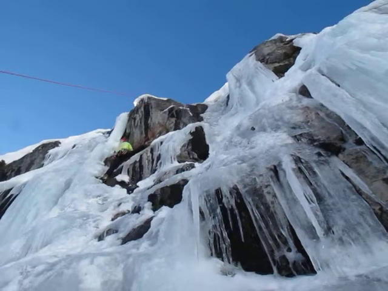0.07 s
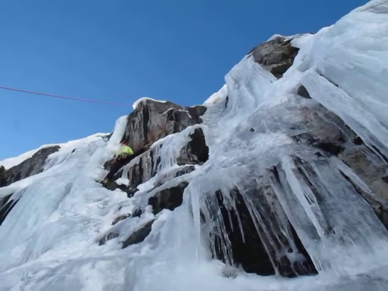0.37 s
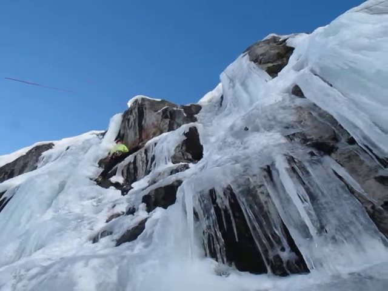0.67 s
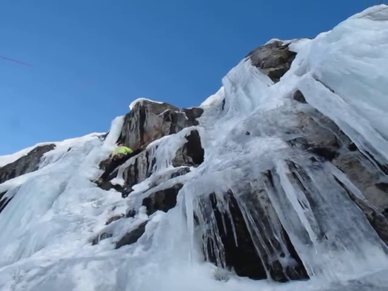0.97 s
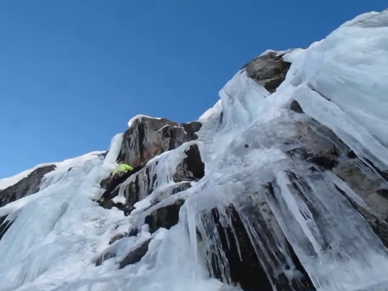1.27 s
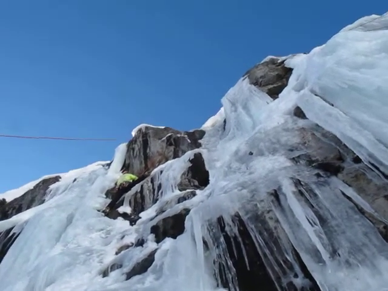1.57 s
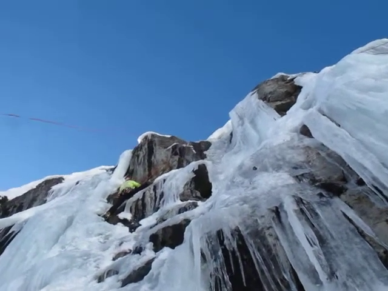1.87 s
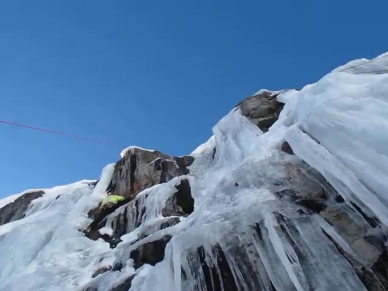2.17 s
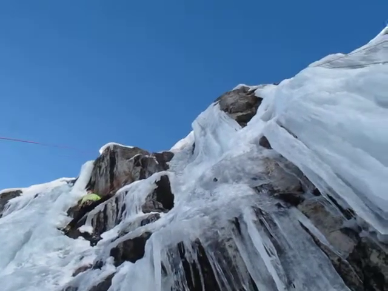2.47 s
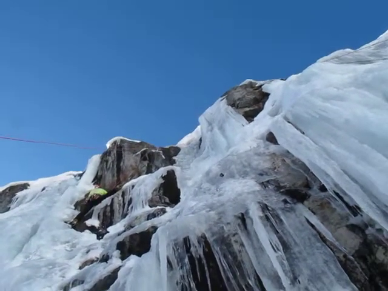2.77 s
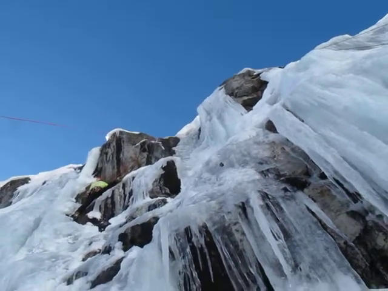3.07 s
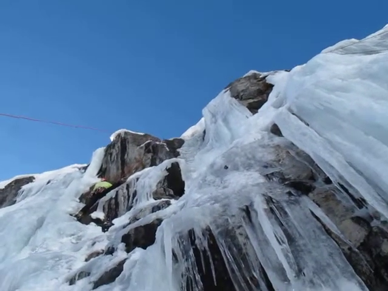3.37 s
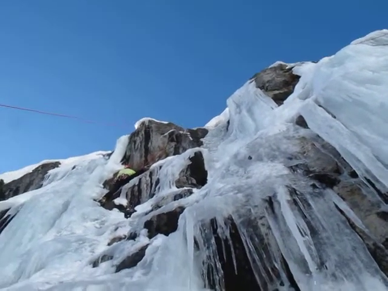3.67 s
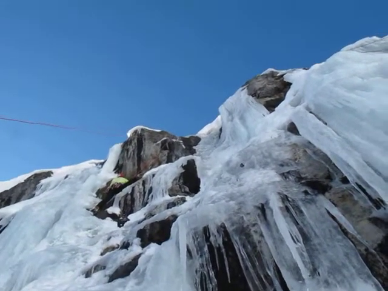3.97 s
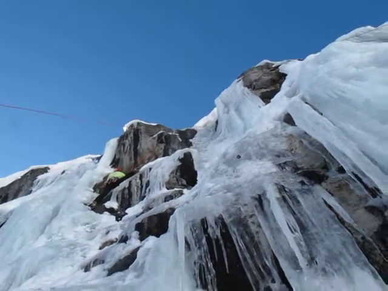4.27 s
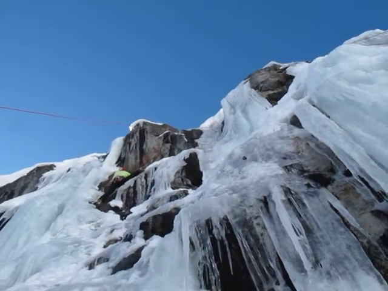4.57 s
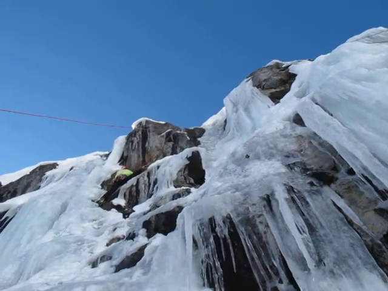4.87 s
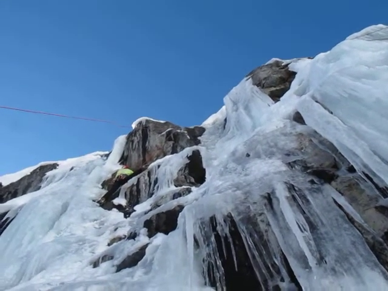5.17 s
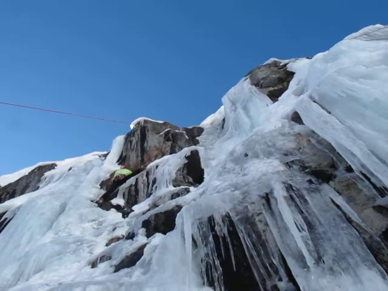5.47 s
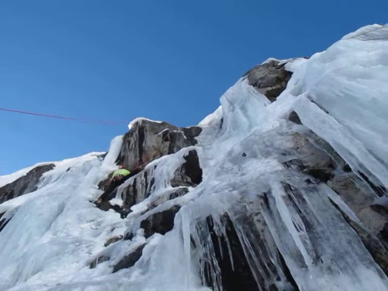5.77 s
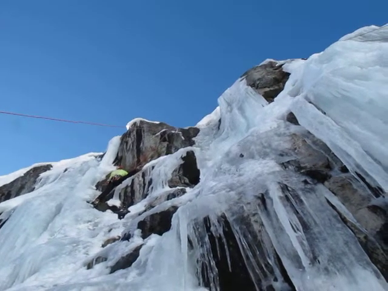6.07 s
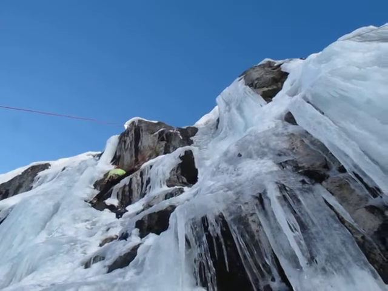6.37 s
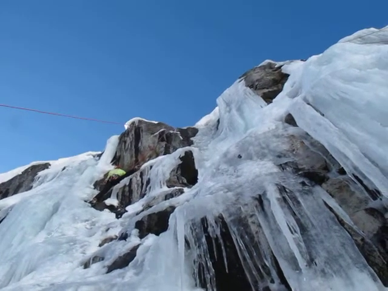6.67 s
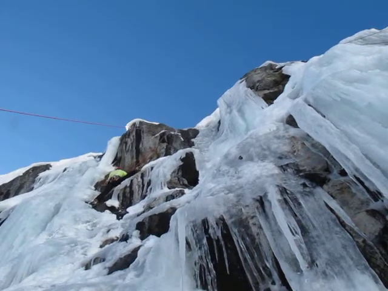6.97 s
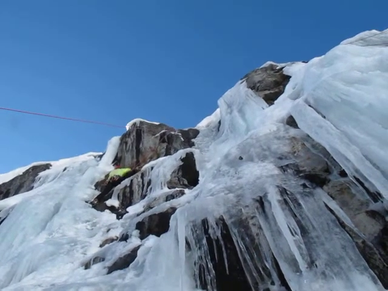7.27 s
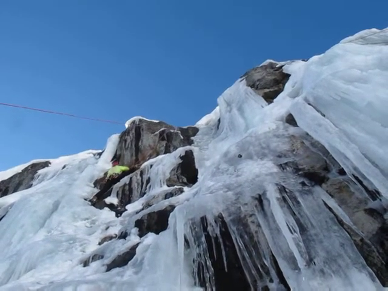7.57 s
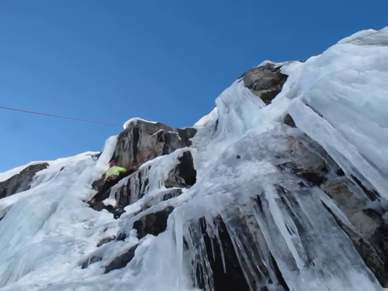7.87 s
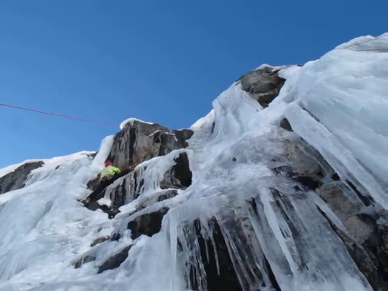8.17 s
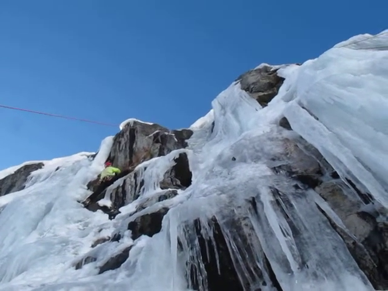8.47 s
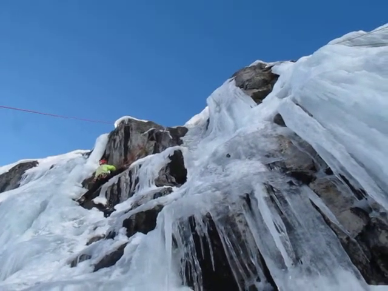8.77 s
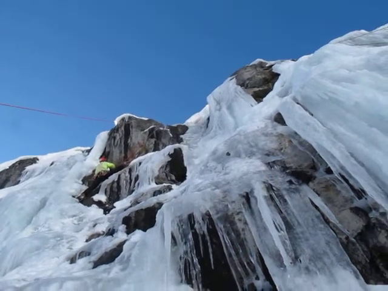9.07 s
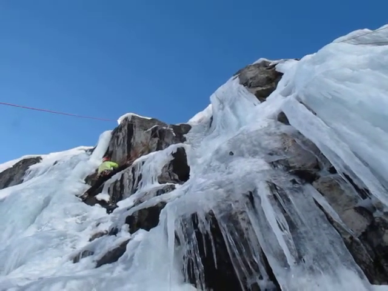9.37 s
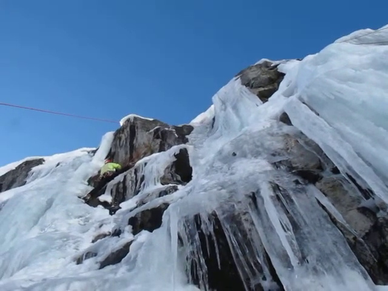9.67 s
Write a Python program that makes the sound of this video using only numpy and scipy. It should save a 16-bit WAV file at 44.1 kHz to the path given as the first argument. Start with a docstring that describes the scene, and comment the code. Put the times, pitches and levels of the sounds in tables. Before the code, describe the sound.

Light wind buffets the microphone with a low, lumpy rumble and soft thumps, over faint hiss and a little clothing rustle.

```python
"""A lumpy rumble of light wind, with clothing rustling over it for the first few seconds.
At the foot of a frozen waterfall, gusts buffet the microphone port and the strongest eddies thump it.
A sleeve catches and slips on a jacket, and the hand that holds the camera makes a few tiny ticks.
Behind it all lie the soft, even rush of the open valley and the microphone's own bright hiss."""
import sys
import numpy as np
from scipy import signal
from scipy.fft import rfft, irfft
from scipy.io import wavfile
from scipy.ndimage import uniform_filter1d

SR = 44100
rng = np.random.default_rng(int(sys.argv[2]) if len(sys.argv) > 2 else 0)


def unload_audio(sound):
    """Save the sound as a 16-bit wav file, at the path given as the first command line argument."""
    columns = np.transpose(np.atleast_2d(sound))
    # keep every value between -1 and 1, then stretch to whole-number steps
    steps = np.round(np.clip(columns, -1, 1) * 32767)
    wavfile.write(sys.argv[1], SR, steps.astype(np.int16))


N = 437472

# colour of the valley's far rush: frequency_hz, gain_db
VALLEY_EQ = [(100, -1.5), (320, 0.5), (480, 1), (630, -0.5), (780, 1), (900, -0.5), (1420, -1),
             (1650, -6.5), (2150, -6), (2500, -8.5), (2900, -19.5), (6000, -45)]
# slow rise and fall of that rush: time_s, level_db
VALLEY_FADER = [(0, -53.5), (1.6, -53), (3.9, -53.6), (4.6, -54.5), (6, -53.5), (9.1, -53), (9.92, -54)]
# colour of the microphone's hiss: frequency_hz, gain_db
HISS_EQ = [(200, -5), (2800, 0.5), (3700, 1), (4400, -0.5), (5200, 1), (6100, -1.5), (7600, -1),
           (9300, 0.5), (10400, -0.5), (11500, -5), (12700, -11), (14000, -17.5), (15700, -24)]
# colour of rubbing cloth: frequency_hz, gain_db
CLOTH_EQ = [(1500, -3), (3000, -5), (6500, -3.5), (8500, -5), (10800, -2), (12500, -13), (15500, -23)]
# strokes of the sleeve on the jacket: peak_s, level_db, half_length_s
SLEEVE_STROKES = [(0.064, -56.5, 0.11), (0.44, -58, 0.37), (0.973, -58, 0.075), (1.32, -62, 0.093),
                  (1.8, -62.5, 0.49), (3.25, -59, 0.17)]
# finger slips, before trim, widening and shell: start_s, level_db, centre_hz, spread_octaves, length_s
FINGER_TICKS = [(0.0412, -46, 8800, 0.37, 0.003), (0.06, -44, 8700, 0.51, 0.0046),
                (0.0715, -33, 8200, 0.21, 0.0016), (0.1155, -43, 7050, 0.15, 0.0014),
                (0.217, -47, 3400, 0.64, 0.0015), (0.388, -45.5, 6400, 0.7, 0.0037),
                (0.522, -45, 9900, 0.37, 0.0006), (1.035, -44, 5900, 0.5, 0.0028),
                (1.261, -35, 7900, 0.88, 0.0027), (1.2923, -46, 5800, 0.71, 0.0024),
                (4.1436, -44, 7900, 0.29, 0.0007), (4.6957, -43.5, 10300, 0.35, 0.0015),
                (5.478, -37.5, 8200, 0.15, 0.0013), (5.546, -45, 9700, 0.27, 0.0024),
                (5.575, -41, 8200, 0.55, 0.0009), (6.469, -48.5, 3500, 0.35, 0.0015),
                (7.337, -45, 4000, 0.7, 0.0013), (8.2428, -42.5, 9500, 0.3, 0.0015),
                (9.1335, -43.5, 7500, 0.31, 0.0012)]
# how the camera's shell passes a tick to the microphone: frequency_hz, gain_db
SHELL_EQ = [(1200, 1), (3000, 5), (5000, 1.5), (8000, -3.5), (10500, 2.5), (12000, 1), (13500, -6),
            (15500, -13)]
# wind strength at the port, as the big swirls' level before trim and flutter: time_s, level_db
WIND_FADER = [(0.0, -35.5), (0.12, -34.5), (0.88, -39.4), (1.04, -35.5), (1.2, -37.5), (1.48, -34.5),
              (1.96, -38.5), (2.72, -35.5), (3.0, -41.5), (3.24, -34), (3.56, -35), (3.8, -41.5),
              (4.24, -36.5), (4.36, -41), (5.04, -35.8), (5.48, -35), (5.56, -38.5), (5.96, -32),
              (6.36, -36.5), (7.96, -30), (8.08, -37.5), (9.6, -39.9), (9.72, -33), (9.88, -40.5)]
# deep rumble of the big, slow swirls: frequency_hz, gain_db
BIG_SWIRL_EQ = [(6, -19), (15, -2), (25, 0), (44, -0.5), (75, -2.5), (105, -9.5), (135, -31), (200, -43)]
# starting colour of the small, quick swirls: frequency_hz, gain_db
SMALL_SWIRL_EQ = [(70, -9.5), (110, 3), (135, 0.5), (170, -8), (210, -15.5), (260, -17.5), (340, -28),
                  (600, -39)]
# the strongest eddies, each a pressure dip heard as a soft thump: peak_s, level_db, unstretched_pitch_hz
EDDY_THUMPS = [(0.157, -31.5, 93), (0.621, -28, 108), (1.061, -23.5, 116), (1.481, -23, 90),
               (1.666, -24, 142), (2.174, -27.5, 104), (2.574, -25, 93), (2.693, -22.5, 116),
               (3.254, -25.5, 98.5), (3.509, -21, 98), (5.254, -26.5, 102), (6.008, -21.5, 92),
               (6.274, -23.5, 93), (6.643, -23, 91), (6.92, -20, 82.4), (7.249, -22, 78),
               (7.292, -23.5, 88), (7.504, -22, 83), (7.886, -19.5, 110), (7.942, -14.5, 119),
               (8.62, -21.5, 100), (8.997, -26.5, 98), (9.11, -26.5, 86), (9.724, -21.5, 121)]

BREEZE_DB, SMALL_SWIRL_DB = -35.5, -46.5   # the usual wind strength, and the small swirls' level in it
SMALL_SWIRL_GROWTH = 1.36   # dB they gain for each dB of wind
WAKE_HALF_S, WAKE_DB = 0.034, -16   # small swirls around each eddy; level relative to its dip
CUTOFF_HZ = 15750


def from_db(db):
    """Decibels to gain."""
    return 10 ** (np.asarray(db) / 20)


def unit_rms(x):
    """Scale to unit power."""
    return x / np.sqrt(np.mean(x ** 2) + 1e-20)


def fader_db(points):
    """Ride a level in straight lines from point to point."""
    return np.interp(np.arange(N) / SR, *np.transpose(points))


def swell(peak_s, half_s):
    """A bell-shaped fade up to 1 and down again."""
    return np.exp(-np.minimum(((np.arange(N) / SR - peak_s) / half_s) ** 2, 20))


def equalise(x, eq):
    """Apply an EQ curve, rolling off 20 dB an octave beyond its ends."""
    hz, db = np.transpose(eq)
    octave = np.log2(np.maximum(np.fft.rfftfreq(N, 1 / SR), 1))
    beyond = np.abs(octave - np.clip(octave, np.log2(hz[0]), np.log2(hz[-1])))
    gain = from_db(np.interp(octave, np.log2(hz), db) - 20 * beyond)
    return irfft(rfft(x) * gain, N)


def noise(eq):
    """Coloured noise at unit power."""
    return unit_rms(equalise(rng.standard_normal(N), eq))


def drift(rate_hz):
    """A random wobble at unit power, moving at up to about rate_hz."""
    return noise([(1, 0), (rate_hz, 0)])


def levelled(x, span_s):
    """Iron out level changes slower than span_s."""
    size = int(span_s * SR)
    power = uniform_filter1d(uniform_filter1d(x ** 2, size), size)
    return unit_rms(x / np.sqrt(np.abs(power) + 1e-6))


def valley_rush(waver_db):
    """The open valley gives a soft, far bed of noise that wavers a little."""
    return from_db(fader_db(VALLEY_FADER) + waver_db * drift(rate_hz=5.4)) * noise(VALLEY_EQ)


def microphone_hiss(level_db):
    """The microphone's own noise, bright and steady."""
    return from_db(level_db) * noise(HISS_EQ)


def sleeve_rustle(rubbing, catches_per_s, grain_scatter_db):
    """Threads catch and slip: dense tiny grains of uneven size."""
    caught = rng.random(N) < catches_per_s / SR
    grains = caught * rng.standard_normal(N)
    grains *= from_db(grain_scatter_db * np.minimum(rng.exponential(1, N), 4))
    return rubbing * unit_rms(equalise(grains, CLOTH_EQ))


def cloth_tick_cues(rubbing, peak_per_s, level_db, centre_hz, octaves, length_s):
    """Faint random ticks crowd in as the sleeve rubs harder; rows as in FINGER_TICKS."""
    ticks_per_s = peak_per_s * (rubbing / rubbing.max()) ** 2
    starts_s = np.flatnonzero(rng.random(N) < ticks_per_s / SR) / SR
    scatter = rng.uniform(-1, 1, (len(starts_s), 2))
    return [(start_s, level_db + 2 * louder, centre_hz * 2 ** (higher / 2), octaves, length_s)
            for start_s, (louder, higher) in zip(starts_s, scatter)]


def handling_ticks(cues, trim_db, tail_s, tail_db, widen):
    """Each brief slip is a crack of band-passed grit with a faint tail, heard through the shell."""
    track, size = np.zeros(N + SR), SR // 20
    t = np.arange(size) / SR
    grits = np.sign(rng.standard_normal((len(cues), size)))
    for (start_s, level_db, centre_hz, octaves, length_s), grit in zip(cues, grits):
        edge_ratio = 2 ** np.clip(widen * octaves, .1, 2)
        band_hz = [min(centre_hz / edge_ratio, SR / 3), min(centre_hz * edge_ratio, CUTOFF_HZ)]
        envelope = np.exp(-(t / length_s) ** 4) + from_db(tail_db) * np.exp(-t / tail_s)
        crack = signal.sosfilt(signal.butter(2, band_hz, "band", fs=SR, output="sos"), grit * envelope)
        gain = from_db(level_db + trim_db) * np.sqrt(length_s * SR / size)   # longer slips, more energy
        at = round(start_s * SR)
        track[at:at + size] += gain * unit_rms(crack)
    return equalise(track[:N], SHELL_EQ)


def wind_swirls(big_trim_db, lumps_db, suction_db, big_flutter_db, small_flutter_db):
    """Turbulence hits the port in lumps; small swirls crowd into the pressure dips of the big ones."""
    strength_db = fader_db(WIND_FADER)
    lumps = from_db(lumps_db * drift(rate_hz=19.0))
    big = levelled(noise(BIG_SWIRL_EQ) * lumps, span_s=0.12)
    small = noise(SMALL_SWIRL_EQ) * lumps * from_db(-suction_db * big)
    small = equalise(small, [(70, 0.5), (330, -4.0), (600, 1)])   # scoop the low mids
    small = levelled(small, span_s=0.078)
    flutter = np.tanh(noise([(2, -15), (4, 1.5), (7, -8)]))   # both layers flutter together near 4 Hz
    big_gain = from_db(strength_db + big_trim_db + big_flutter_db * flutter)
    gust_db = SMALL_SWIRL_GROWTH * (strength_db - BREEZE_DB)
    small_gain = from_db(SMALL_SWIRL_DB + gust_db + small_flutter_db * flutter)
    wakes = sum(from_db(db + WAKE_DB) * swell(peak_s, WAKE_HALF_S) for peak_s, db, _ in EDDY_THUMPS)
    return big_gain * big + np.hypot(small_gain, wakes) * small


def with_eddy_thumps(swirls, stretch, duck_depth):
    """A passing vortex sweeps the swirls aside and sucks the pressure down between two rebounds."""
    buffet, t = swirls.copy(), np.arange(N) / SR
    for peak_s, level_db, pitch_hz in EDDY_THUMPS:
        near = np.abs(t - peak_s) < 3 / pitch_hz
        phase = (t[near] - peak_s) * pitch_hz * np.pi / stretch   # stretched: longer and deeper
        buffet[near] *= 1 - duck_depth * np.exp(-(phase / 3) ** 2)
        buffet[near] -= from_db(level_db) * (1 - 2 * phase ** 2) * np.exp(-phase ** 2)
    return buffet


def scene():
    """A mono mix: valley and hiss as the bed, handling over it, wind up front."""
    bed = valley_rush(waver_db=0.6) + microphone_hiss(level_db=-55)
    rubbing = sum(from_db(db) * swell(peak_s, half_s) for peak_s, db, half_s in SLEEVE_STROKES)
    rustle = sleeve_rustle(rubbing, catches_per_s=3000, grain_scatter_db=-2.0)
    cloth_cues = cloth_tick_cues(rubbing, peak_per_s=18, level_db=-49,
                                 centre_hz=7800, octaves=0.6, length_s=0.0025)
    ticks = handling_ticks(FINGER_TICKS + cloth_cues, trim_db=-0.5, tail_s=0.019, tail_db=-17, widen=1.16)
    swirls = wind_swirls(big_trim_db=0.53, lumps_db=3.5, suction_db=4.13,
                         big_flutter_db=2.4, small_flutter_db=5.5)
    buffet = with_eddy_thumps(swirls, stretch=1.19, duck_depth=0.76)
    return (bed + rustle + ticks + buffet)[None]


def record(dry):
    """A steep low-pass takes off the very top."""
    return signal.sosfilt(signal.ellip(12, .1, 80, CUTOFF_HZ, fs=SR, output="sos"), dry)


dry = scene()
out = record(dry)
unload_audio(out)
```